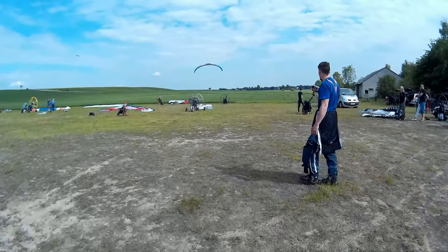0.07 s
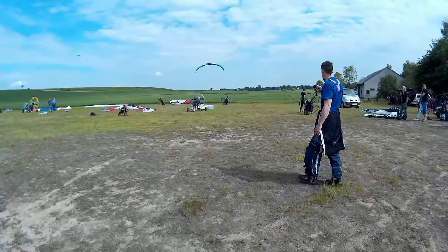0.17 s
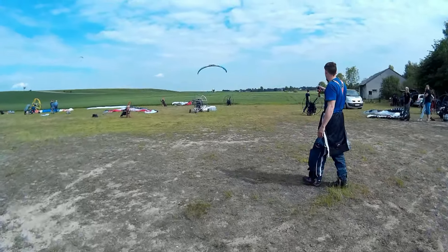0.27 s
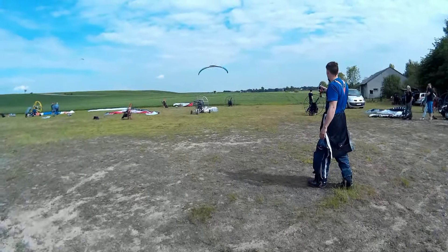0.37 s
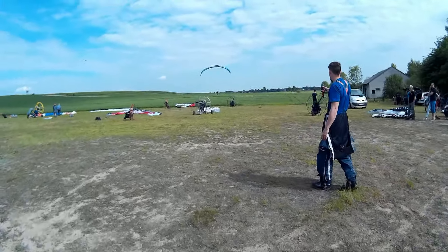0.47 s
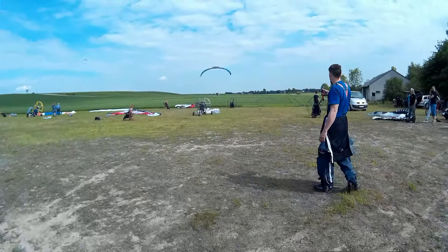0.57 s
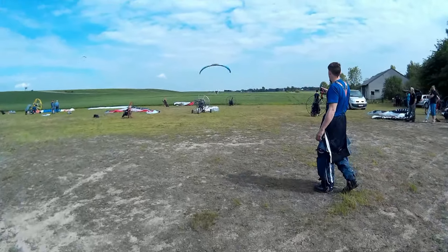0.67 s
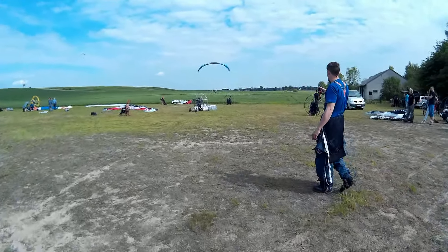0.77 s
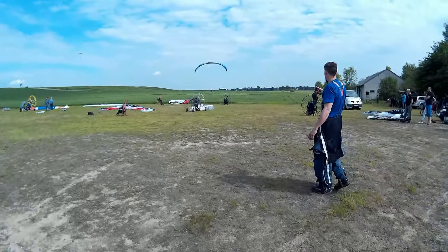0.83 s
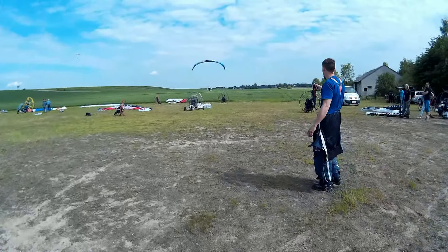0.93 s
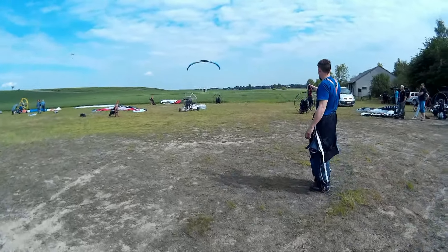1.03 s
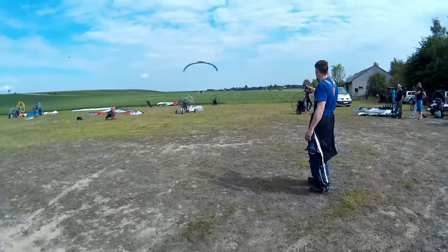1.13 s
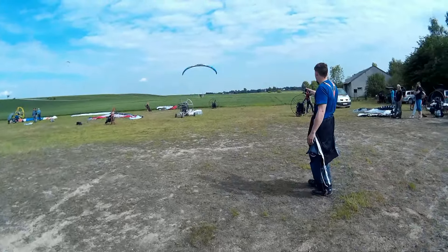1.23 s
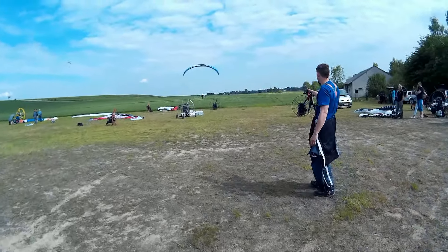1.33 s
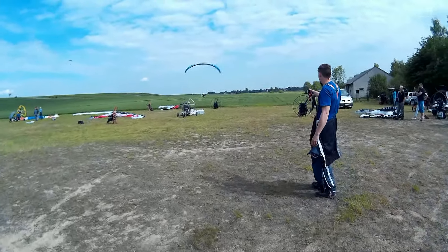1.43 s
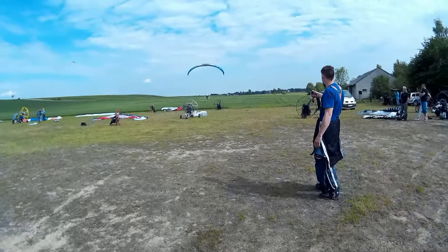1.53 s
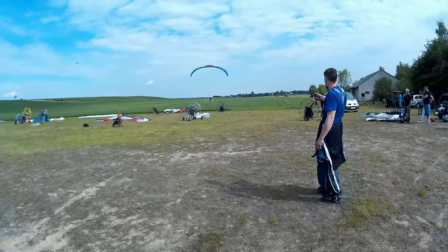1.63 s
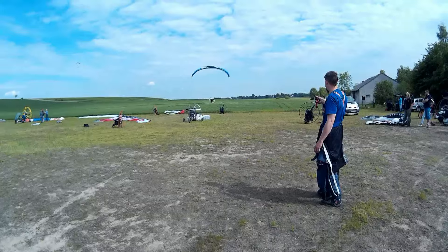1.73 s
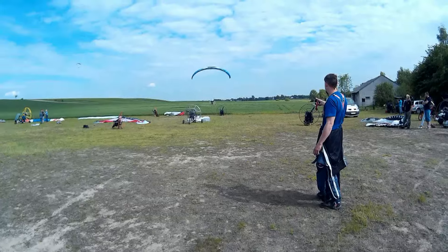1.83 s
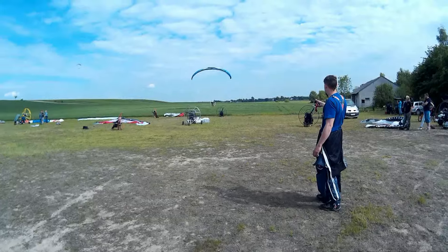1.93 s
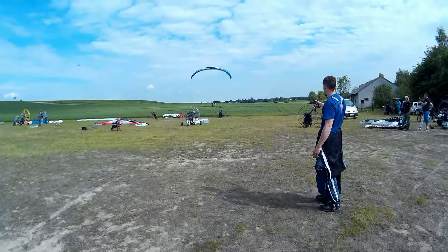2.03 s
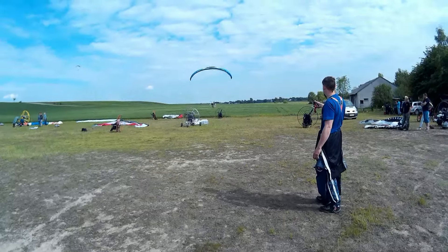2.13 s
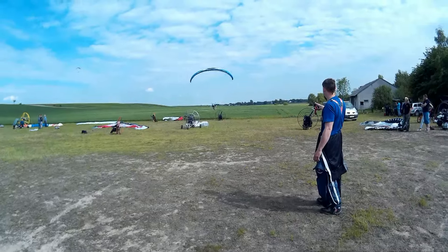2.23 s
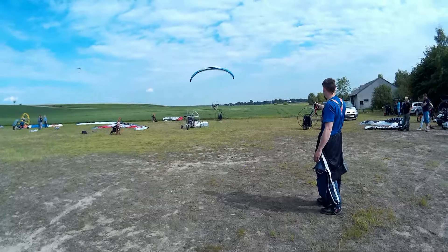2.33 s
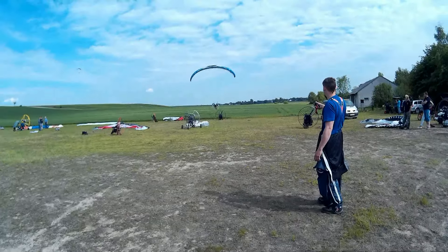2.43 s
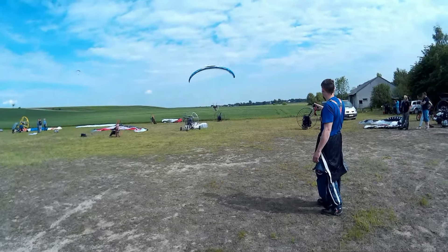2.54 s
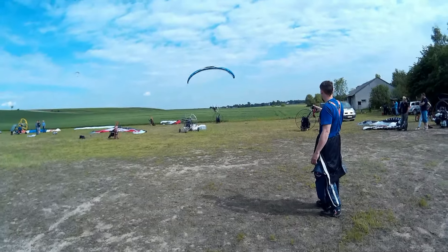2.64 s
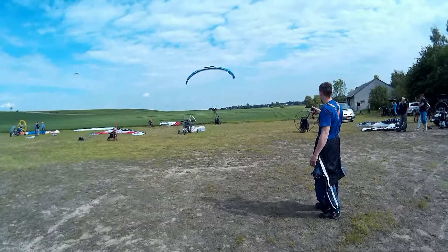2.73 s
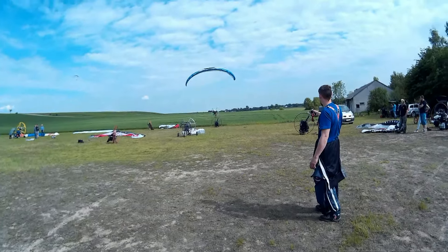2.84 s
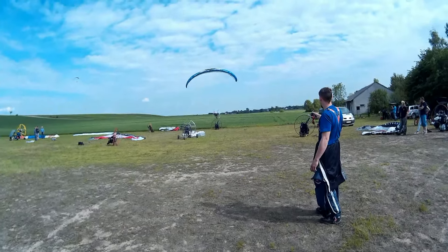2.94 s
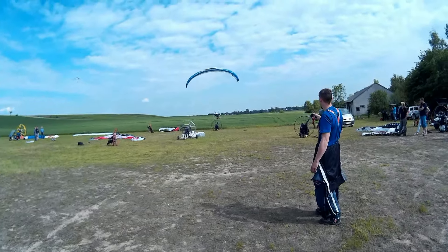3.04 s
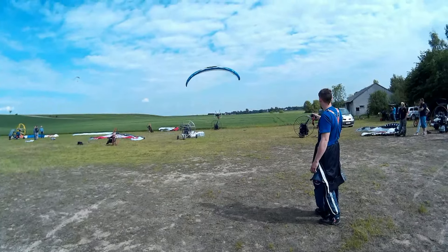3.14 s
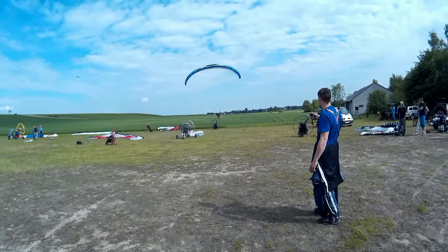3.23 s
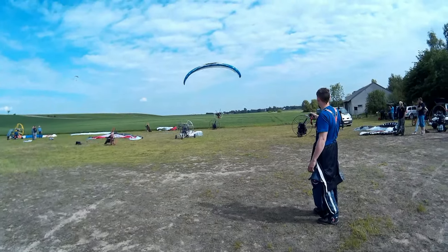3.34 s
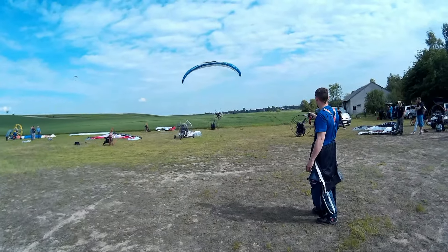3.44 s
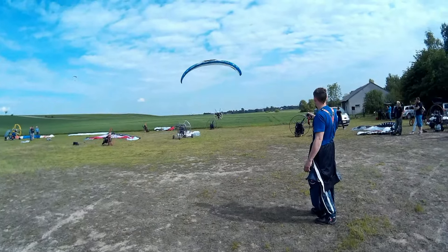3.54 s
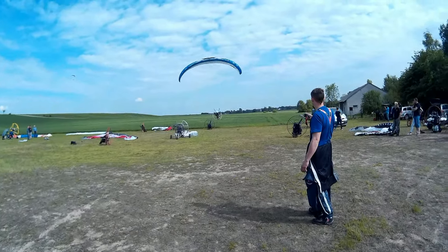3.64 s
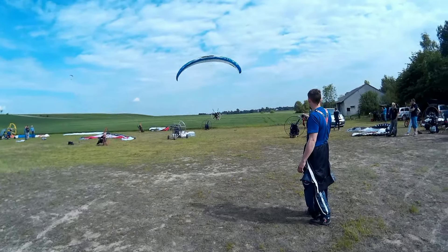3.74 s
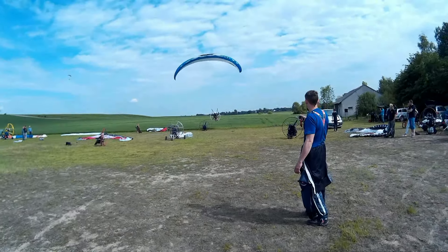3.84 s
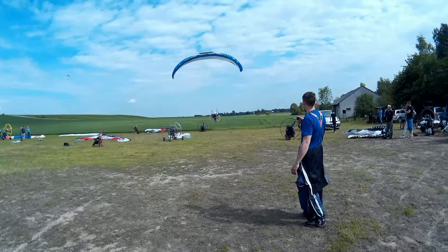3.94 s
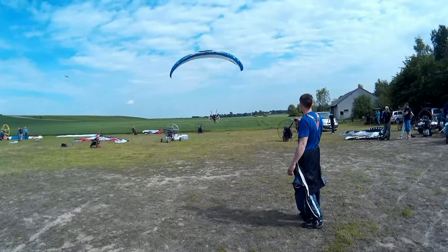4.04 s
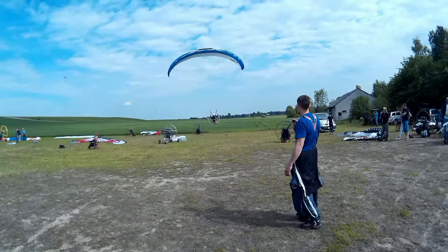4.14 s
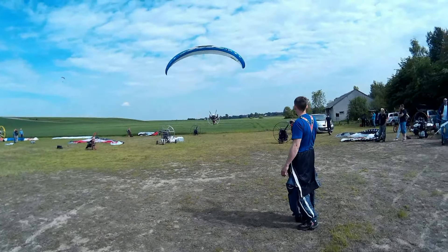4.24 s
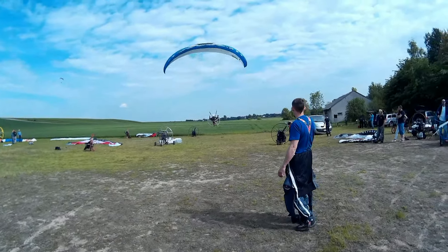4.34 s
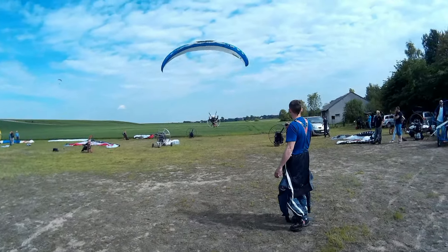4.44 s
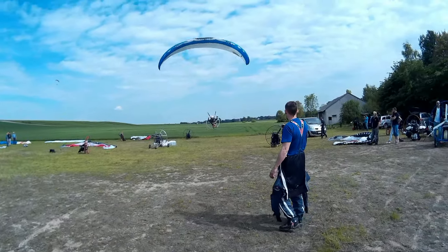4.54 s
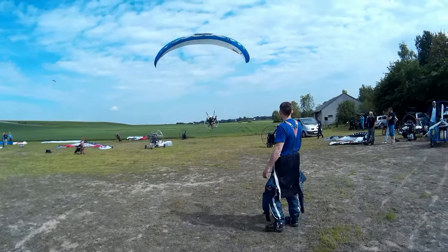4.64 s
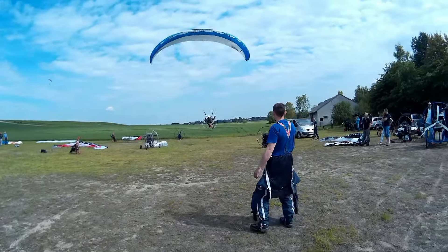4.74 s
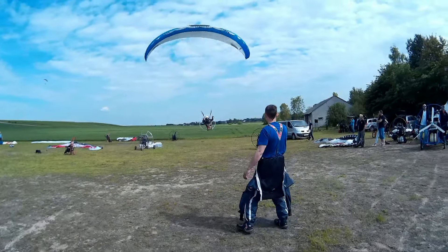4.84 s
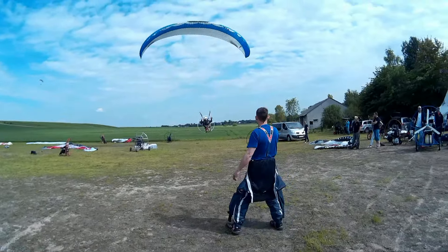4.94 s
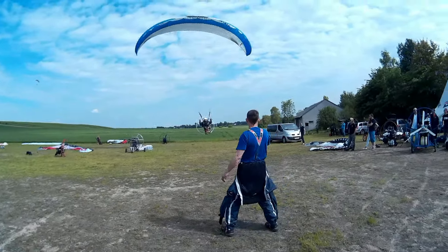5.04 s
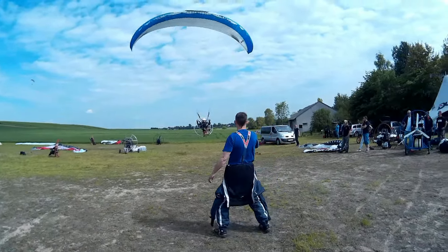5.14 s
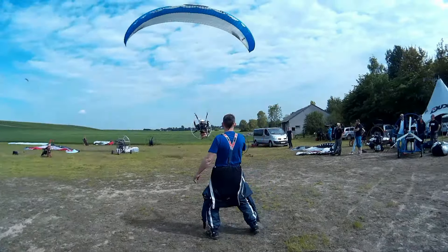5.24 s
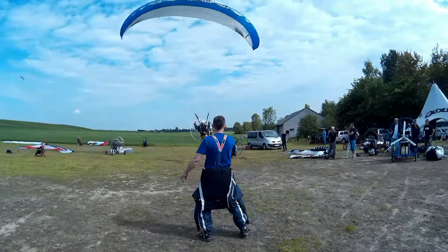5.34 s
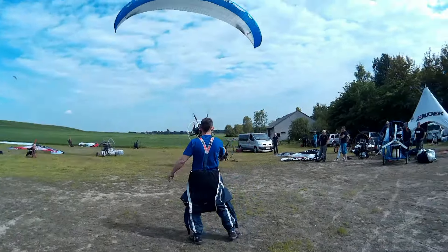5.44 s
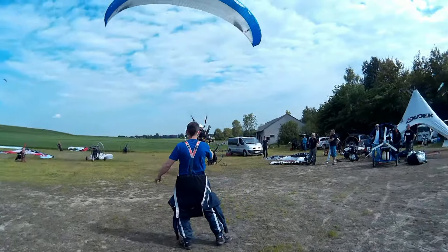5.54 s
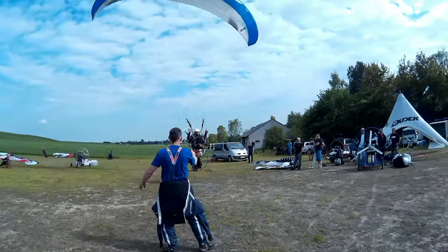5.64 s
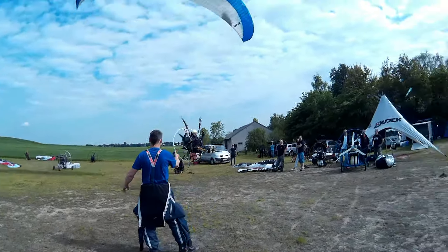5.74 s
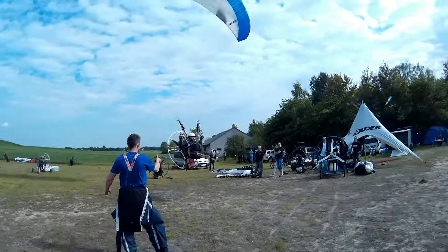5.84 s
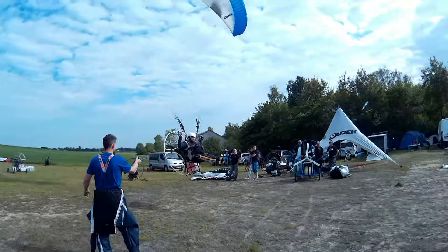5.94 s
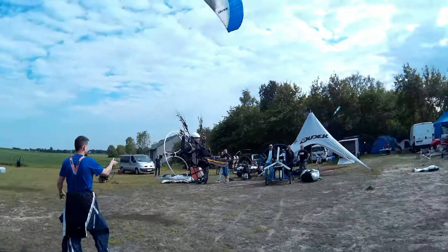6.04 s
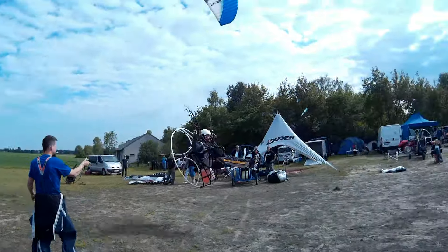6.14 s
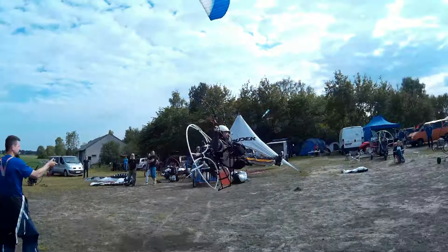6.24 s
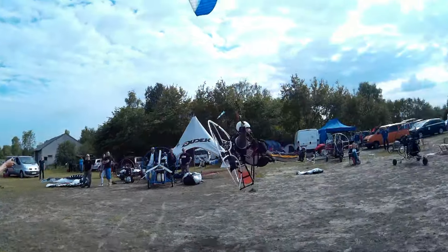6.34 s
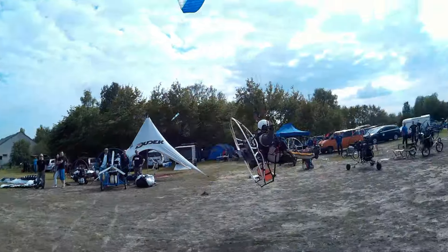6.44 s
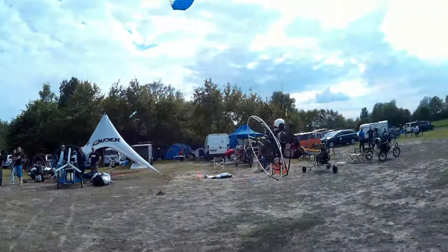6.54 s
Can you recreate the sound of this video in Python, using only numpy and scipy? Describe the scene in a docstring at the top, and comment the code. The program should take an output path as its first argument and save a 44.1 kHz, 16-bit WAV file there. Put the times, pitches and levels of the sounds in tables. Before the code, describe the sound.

A paramotor's two-stroke engine and propeller buzz from the start, fairly distant over an open field, with air rushing off the blades. The pitch rises slightly around 1 second, sags between 1.5 and 2.5 seconds, then climbs back, louder and brighter, by 3 seconds. Near 4 seconds the throttle drops sharply to its lowest pitch. From about 4.4 to 5.4 seconds it revs up again with a gritty rasp, then eases a little. The craft keeps nearing, with a slight sweeping colour from the ground reflection, and is loudest from 6 seconds to the end at about 6.6, with thumping blades, snarling exhaust and sizzling air. Underneath, light wind rumbles on the microphone, gusting near 2, 4 and 6 seconds, over a faint hiss. A few soft, dull thumps come in the first three seconds.

```python
"""A thumping propeller and a snarling two-stroke fly in low over a field: a paramotor, its pilot
blipping the throttle, closest just before the end. The two blades thump and slap, the geared engine
fires 1.4 times per blade pass into a resonant pipe, and air rushes off the blades and sizzles at the
tips. The ground adds a sliding echo; wind buffets the microphone over its own hiss."""
import sys
import numpy as np
from scipy import signal
from scipy.fft import rfft, irfft, next_fast_len
from scipy.io import wavfile
from scipy.ndimage import uniform_filter1d, map_coordinates

SR = 44100
rng = np.random.default_rng(int(sys.argv[2]) if len(sys.argv) > 2 else 0)


def wav_record(signal):
    """Record a signal, one row per channel, as 16-bit PCM in the file named by sys.argv[1]."""
    frames = np.transpose(np.atleast_2d(signal))
    bounded = np.clip(frames, -1, 1)
    # unit amplitude maps onto the largest positive 16-bit level
    quanta = np.round(bounded * 32767).astype(np.int16)
    wavfile.write(sys.argv[1], SR, quanta)


N = 291055
TIME = np.arange(N) / SR


def undb(db):
    return 10 ** (np.asarray(db) / 20)


def curves(table):
    """Automation lanes: each column after the time, one value a sample."""
    times, *columns = np.transpose(table)
    return [np.interp(TIME, times, column) for column in columns]


def colour_db(table, hz):
    """An EQ curve read on a log-frequency axis, silent beyond its ends."""
    points_hz, db = np.transpose(table)
    return np.interp(np.log(hz), np.log(points_hz), db, left=-120, right=-120)


def wander(rate):
    """Smooth random drift, about rate turns a second."""
    knots = rng.standard_normal(int(N / SR * 60) + 2)
    span = int(SR / rate)
    return 1.86 * uniform_filter1d(np.interp(np.arange(N) / span, np.arange(len(knots)), knots), span)


def flickering_noise(colour, flicker_db, rate, bright=0):
    """Noise in half-octave bands, each flickering alone; bright tilts the treble."""
    size = next_fast_len(N)
    hz = np.maximum(np.arange(size // 2 + 1) * SR / size, 1)
    spectrum = rfft(rng.standard_normal(size)) * undb(colour_db(colour, hz))
    spectrum /= np.sqrt(2 * np.sum(abs(spectrum) ** 2)) / size
    out = 0
    for band in range(7, 29):
        window = np.cos(np.pi / 2 * np.clip(2 * np.log2(hz) - band, -1, 1)) ** 2
        tilt_db = bright * np.clip(band / 2 - 9, 0, 1.75)
        out += irfft(spectrum * window, size)[:N] * undb(flicker_db * wander(rate) + tilt_db)
    return out


def overtones(phase, hz, orders, colour, bright, swell_db, blur, scatter, accent_db=lambda k: 0):
    """A pulse train's overtones: turbulent air swells and blurs each, echoes scatter their phases."""
    out, power = 0, 0
    for k in orders:
        tilt_db = bright * np.maximum(np.log2(k * hz / 500), 0)
        gain = undb(colour_db(colour, k * hz) + tilt_db)
        power += gain ** 2 / 2
        drift = blur * np.sqrt(k) * wander(30) + scatter * (rng.standard_normal() + wander(0.96))
        out += gain * undb(swell_db * wander(7) + accent_db(k)) * np.cos(k * phase + drift)
    return out / np.sqrt(power)


# The throttle moves. Each row: time in seconds, blade passes per second.
THROTTLE = [(0.0, 87.9), (0.09, 87.5), (0.58, 88.3), (0.9, 93.0), (1.04, 94.0), (1.17, 92.7), (1.5, 83.6),
            (1.74, 82.8), (2.0, 73.6), (2.16, 72.6), (2.46, 72.7), (2.9, 86.2), (3.17, 87.7), (3.74, 84.3),
            (3.81, 81.5), (4.05, 62.5), (4.29, 58.3), (4.36, 59.5), (4.53, 69.0), (4.65, 74.2),
            (4.84, 79.8), (5.09, 85.3), (5.33, 88.2), (5.48, 88.6), (5.75, 81.5), (6.32, 80.4),
            (6.49, 77.5), (6.58, 77.5)]
# The main faders. Each row: time in seconds; base levels in dB of second blade tone, third blade tone,
# drone, mids, treble, tip sizzle and air rush; the exhaust's share of the mids from 0 to 1.
FADERS = [(0.08, -51.5, -61, -51.5, -55, -65, -78, -52.5, 0.46),
          (0.13, -49.5, -66, -50.5, -49.5, -66, -77, -49.5, 0.52),
          (0.48, -49, -72, -53, -49.5, -70, -76, -50, 0.2),
          (0.8, -45, -79, -51.5, -43, -58.5, -70.5, -49, 0.4),
          (1.12, -46.5, -64, -44.5, -47.5, -64.5, -80, -49, 0.1),
          (1.36, -43.5, -66, -50.5, -43, -65, -78, -47, 0.4),
          (1.48, -47, -61, -55, -46.5, -65, -77, -49.5, 0.6),
          (1.55, -44, -59, -51, -42.5, -65, -75, -45.5, 0.4),
          (1.67, -43, -57, -53.5, -43.5, -56, -72, -47.5, 0.16),
          (1.87, -48.5, -57, -48, -44, -62, -78, -49.5, 0.8),
          (2.07, -53.5, -58, -52.5, -48.5, -74, -88, -47, 0.76),
          (2.46, -52, -63, -52.5, -48.5, -67.5, -83, -48, 0.62),
          (2.6, -49.5, -58.5, -44, -42.5, -61, -81, -43.5, 0.37),
          (2.75, -43, -48.5, -49, -35.5, -57, -66, -42, 0.5),
          (2.91, -40.5, -54, -40.5, -35, -44.5, -64, -42.5, 0.34),
          (3.07, -41, -56, -37, -36, -41, -64, -41, 0),
          (3.22, -41.5, -54, -39.5, -32.5, -40.5, -60.5, -45, 0.05),
          (3.4, -40.5, -50, -41, -34.5, -43, -65.5, -43.5, 0.32),
          (3.72, -43, -38.5, -40.5, -37, -48, -60, -44.5, 0.24),
          (3.98, -48.5, -46, -41, -44, -57.5, -66.5, -42, 0.1),
          (4.28, -49.5, -45, -42, -36, -50, -69, -42, 0.3),
          (4.48, -47.5, -41.5, -44, -32.5, -44.5, -62.5, -43.5, 0.18),
          (4.68, -45, -43, -43, -30.5, -50, -69, -37, 0.38),
          (4.83, -43, -49.5, -42.5, -30, -39.5, -62, -42, 0.3),
          (5.02, -38.5, -45, -46, -31.5, -43.5, -62, -43, 0.38),
          (5.19, -37.5, -44, -45, -38.5, -52.5, -65, -45, 0.31),
          (5.46, -33, -42.5, -43, -33.5, -49, -68.5, -45, 0.46),
          (5.8, -31.5, -45.5, -41, -33.5, -51, -64.5, -39.5, 0.58),
          (5.93, -31.5, -39.5, -41, -28, -43, -55.5, -38, 0.54),
          (6.05, -29.5, -56, -35.5, -29.5, -39.5, -54.5, -40, 0.2),
          (6.22, -30.5, -64, -33.5, -31, -39, -50, -36.5, 0.83),
          (6.25, -31.5, -42, -37, -27.5, -35, -49.5, -38, 0.61),
          (6.38, -32.5, -39.5, -43.5, -25, -37, -53, -37, 0.71),
          (6.56, -30.5, -40.5, -49, -24, -35.5, -50, -34, 0.76)]
# Shifts of timbre. Each row: time in seconds, then boosts in dB for blade overtones 6-8, 13-16, 10 and
# every third (8, 11, 14 ..), for the exhaust's bark and for its throb.
ACCENTS = [(0, 11.5, -5, 5, 10.5, 0, 7), (.5, 2, 7, 5, 1, 2, 1.5), (1, -2, 1.5, 2, 5, 1, 10),
           (1.4, 3.5, 7, 0, 1, 1, 3.5), (1.8, 2, 0, 0, 5, 1, -4), (2.2, 9, -10, -2, -3, 0, -3),
           (2.55, 11, 7, 3, 2, 7, -0.5), (2.8, -6, -9, 5, 5.5, 0, -3), (3.1, -7, -7, 8, -2, 0, 6),
           (3.4, -4, 6, 6.5, 1.5, 1, -12), (3.7, 0, 2, -2, 7.5, -5, 0), (4, -6.5, -0.5, 7, -3, 11, 6),
           (4.3, -5, -0.5, 3, 3, 3.5, 4), (4.6, -7.5, -3, 5, 0, 6.5, 2), (4.9, -6.5, -3, 0, -1.5, -1, 1.5),
           (5.2, 2.5, 0, 8.5, 3, 3, -2.5), (5.5, -1.5, -1, 0, 1.5, -2, -2.5), (5.9, 3.5, 3, -6, 0.5, 0, -5),
           (6.2, -3, -4.5, 9, 1.5, 8.5, -5.5), (6.6, 5.5, -3, 0, 2, 1.5, -8)]
# Grit, worst while the propeller chops its own wake and then stalls under load.
# Each row: time in seconds, base phase blur in radians.
ROUGHNESS = [(0, .1), (2.7, .1), (3.8, .1), (4.15, .26), (4.45, .5), (4.75, .44), (5.0, .22), (5.35, .13),
             (6.6, .14)]
AIRSPEED_M_S, CLOSEST_AT_S, CLOSEST_M = 16, 6.42, 3.5
FIRINGS_PER_BLADE, LOAD_DB_PER_HZ_S = 1.4, 0.1718


def paramotor():
    """Propeller, exhaust and rushing air, all locked to one shaft speed."""
    second_db, third_db, drone_db, mid_db, treble_db, sizzle_db, rush_db, share = curves(FADERS)
    *slap_accents, bark_db, throb_db = curves(ACCENTS)
    rough = curves(ROUGHNESS)[0]
    blade_hz = uniform_filter1d(curves(THROTTLE)[0], int(.06 * SR), mode="nearest")
    blade_phase = 2 * np.pi * np.cumsum(blade_hz) / SR
    fire_phase, fire_hz = FIRINGS_PER_BLADE * blade_phase, FIRINGS_PER_BLADE * blade_hz
    rev_rate = uniform_filter1d(np.gradient(blade_hz) * SR, SR // 5, origin=-SR // 20)
    load_db = LOAD_DB_PER_HZ_S * np.maximum(rev_rate, 0)  # revving up deepens thump and throb
    metres = np.hypot(AIRSPEED_M_S * (TIME - CLOSEST_AT_S), CLOSEST_M)
    bright = 9 + 0.22 * (treble_db - mid_db + 13)  # dB per octave above 500 Hz
    slap_gain, snarl_gain = undb(mid_db) * (1 - share), undb(mid_db + 2) * share

    thump = blade_thump(blade_phase, second_db, third_db, load_db, metres)
    drone = undb(drone_db) * blade_drone(blade_phase, blade_hz, bright)
    slap = blade_slap(blade_phase, blade_hz, bright, rough, slap_gain, treble_db, slap_accents)
    throb = exhaust_throb(fire_phase, fire_hz, bright, load_db + throb_db, metres)
    snarl = snarl_gain * exhaust_snarl(fire_phase, fire_hz, bright, rough, bark_db)
    rush, sizzle = blade_air(blade_phase, fire_phase, bright, rush_db, sizzle_db)
    # Long low waves pass the echo unchanged, and the grass swallows the echo of the sizzle.
    return thump + drone + throb + sizzle + ground_echo(slap + snarl + rush) + noise_swells(blade_phase)


def blade_thump(phase, second_db, third_db, load_db, metres):
    """The three lowest tones of the blades' pressure pulse; the fundamental is strongest side-on."""
    side_on = (CLOSEST_M / metres) ** 2
    first_db = second_db - 8 + 13.5 * side_on + load_db
    levels_db = (first_db, second_db, third_db)
    return np.sqrt(2) * sum(undb(db) * np.cos(k * phase) for k, db in enumerate(levels_db, 1))


# The EQ of the blade overtones. Each row: frequency in Hz, gain in dB.
BLADE_EQ = [(150, 43), (260, 3.5), (350, 12), (440, 11), (560, 11.5), (680, 2), (800, 7), (920, 2.5),
            (1050, 1.5), (1250, -11.5), (1500, -16), (1900, -22), (2600, -39)]


def blade_drone(phase, hz, bright):
    """The fourth and fifth blade tones hum together, trading weight."""
    fourth, fifth = (overtones(phase, hz, [k], BLADE_EQ, bright, swell_db=1.2, blur=.08, scatter=.3)
                     for k in (4, 5))
    balance = undb(curves(GROUND_BOUNCE)[2])
    return (balance * fourth + fifth) / np.hypot(balance, 1)


def blade_slap(phase, hz, bright, rough, mid_gain, treble_db, accents):
    """The sharp part of each blade pulse: a midrange buzz with a raspy edge."""
    low_db, high_db, tenth_db, every_third_db = accents

    def comb_db(k):
        return every_third_db if k % 3 == 2 else -every_third_db / 2

    def buzz_db(k):
        return comb_db(k) + (low_db if k < 9 else high_db if k > 12 else {10: tenth_db, 12: 2}.get(k, 0))

    buzz = overtones(phase, hz, range(6, 17), BLADE_EQ, bright,
                     swell_db=1.4, blur=.75 * rough, scatter=1.5, accent_db=buzz_db)
    edge = overtones(phase, hz, range(17, 29), BLADE_EQ, bright=0,
                     swell_db=2, blur=1.3 * rough, scatter=1.5, accent_db=comb_db)
    return mid_gain * buzz + undb(treble_db - 7) * edge


# The resonances of the exhaust pipe. Each row: frequency in Hz, gain in dB.
PIPE_EQ = [(80, -11), (100, -12.5), (118, 12.5), (170, -1), (240, 1), (340, -34), (450, -9), (560, 11.5),
           (670, 13), (790, -9), (900, 5), (1100, -3.5), (1230, -11), (1350, -11), (1700, -46), (2600, -38)]


def exhaust_throb(phase, hz, bright, boost_db, metres):
    """The three lowest firing tones, growing as the engine nears."""
    throb = overtones(phase, hz, range(1, 4), PIPE_EQ, bright, swell_db=2, blur=.1, scatter=.5)
    return undb(boost_db - 21) / metres * throb


# The exhaust's fifth and sixth overtones swell and dip. Each row: time in seconds, gain in dB.
EXHAUST_MID_FADER = [(0, 5), (.7, -2), (2, -3), (2.9, 0), (3.8, -9), (4.3, 2), (4.8, -1.5), (5.3, 4),
                     (5.9, -1), (6.6, -1)]


def exhaust_snarl(phase, hz, bright, rough, bark_db):
    """Upper firing overtones ring through the pipe; four of them carry the bark."""
    mid_boost_db = curves(EXHAUST_MID_FADER)[0]
    boosts_db = {5: mid_boost_db, 6: mid_boost_db,
                 7: bark_db, 12: bark_db, 4: 2 * bark_db, 16: 2 * bark_db}
    return overtones(phase, hz, range(4, 22), PIPE_EQ, bright,
                     swell_db=1.2, blur=.8 * rough, scatter=.8, accent_db=lambda k: boosts_db.get(k, 0))


# Air rush, dulled by the microphone housing. Each row: frequency in Hz, gain in dB.
RUSH_EQ = [(60, 2.5), (140, 11.5), (270, 6), (450, 14.5), (650, 12), (1000, 3), (1400, -7.5), (1750, -11),
           (2000, -21), (2400, -22.5), (3200, -45.5), (4500, -47.5)]
# Tip sizzle through the housing's treble resonances. Each row: frequency in Hz, gain in dB.
SIZZLE_EQ = [(1200, -33), (2000, 8), (2700, 8), (3200, -2.5), (3900, -4), (4500, -8), (5300, -9),
             (6300, -24.5), (7700, -15), (9200, -22), (10400, -28), (12000, -20.5), (13500, -32),
             (15800, -52)]


def blade_air(blade_phase, fire_phase, bright, rush_db, sizzle_db):
    """Air off the blades and their tips puffs with each pass and firing, and swells with eddies."""
    rush = undb(rush_db) * flickering_noise(RUSH_EQ, flicker_db=.7, rate=6, bright=bright)
    sizzle = undb(sizzle_db) * flickering_noise(SIZZLE_EQ, flicker_db=1, rate=8)
    puff = 1 + 0.14 * np.cos(blade_phase) + 0.22 * np.cos(fire_phase)
    puff *= undb(.4 * wander(6))
    return puff * rush, puff * sizzle


# The bounce off the field. Each row: time in seconds, first comb peak in Hz, echo strength from 0 to 1,
# the drone's fourth tone over its fifth in dB.
GROUND_BOUNCE = [(0, 2000, 0.03, -17), (.5, 1850, 0.3, 0), (1, 1880, 0.38, 2), (1.5, 1880, 0.31, -9),
                 (2, 1700, 0.3, -5.5), (2.5, 1690, 0.19, -15), (2.9, 1760, 0.32, -15),
                 (3.3, 1750, 0.48, -4), (3.7, 1770, 0.34, -0.5), (4, 1380, 0.5, 1.5), (4.4, 1360, 0.43, 0),
                 (4.8, 1360, 0.28, -10), (5.1, 1200, 0.24, 3), (5.5, 1240, 0.12, 1.5),
                 (5.85, 1220, 0.15, 9), (6.1, 1220, 0, 3), (6.35, 1360, 0, 5.5), (6.6, 1450, 0.07, 4)]


def ground_echo(direct):
    """The field mirrors the sound a little late: peaks and dips slide as the path changes."""
    peak_hz, strength, _ = curves(GROUND_BOUNCE)
    lag = uniform_filter1d(SR / peak_hz, SR // 10, mode="nearest")
    echo = map_coordinates(direct, [np.arange(N) - lag], mode="nearest")
    return (direct + strength * echo) / np.hypot(1, strength)


# The wind's rumble. Each row: frequency in Hz, gain in dB.
WIND_EQ = [(15, -24), (30, -17), (60, -19), (110, -24), (200, -28), (400, -42)]
# Stronger gusts. Each row: peak time in seconds, level in dB, half-length in seconds.
WIND_GUSTS = [(2.17, -56, 0.086), (3.237, -64, 0.38), (3.7, -65, 0.12), (4.012, -54, 0.09),
              (4.21, -62, 0.13), (6.024, -56, 0.16)]


def wind():
    """Low, restless buffeting on the microphone, with gusts on top."""
    gusts = sum(undb(db) * np.exp(-((TIME - peak_s) / half_s) ** 2) for peak_s, db, half_s in WIND_GUSTS)
    breeze = undb(-60.5 + 4.5 * wander(14))
    return (breeze + gusts) * flickering_noise(WIND_EQ, flicker_db=2.2, rate=6)


# Dull low thumps. Each row: start in seconds, level in dB, pitch in Hz.
LOW_THUMPS = [(.105, -43, 45), (0.32, -34.5, 112), (0.575, -39.5, 61), (1.624, -45, 84), (1.88, -52, 70),
              (3.07, -41, 90)]


def low_thumps():
    """Three soft cycles of a low tone each, like footsteps or knocks on the camera."""
    out = np.zeros(N)
    for start_s, db, hz in LOW_THUMPS:
        cycles = np.arange(int(3 * SR / hz)) * hz / SR
        envelope = undb(db) * np.sin(np.pi * cycles / 3) ** 2
        start = int(start_s * SR)
        out[start:start + len(cycles)] += envelope * np.sin(2 * np.pi * cycles)
    return out


# Brief swells of whistle, rasp and high hiss. Each row: peak time in seconds, half-length in seconds,
# centre in Hz, width in Hz, level in dB.
NOISE_SWELLS = [(2.98, 0.42, 4000, 260, -75), (3.163, 0.11, 940, 160, -46), (3.704, 0.15, 940, 140, -46),
                (4.417, 0.061, 1400, 200, -43.5), (4.52, 0.29, 3470, 800, -69.5),
                (4.656, 0.21, 1420, 348, -44), (6.448, 0.26, 3540, 800, -58.5),
                (6.52, 0.29, 1750, 400, -46), (1.2, .25, 1100, 880, -57), (4.6, 0.17, 1160, 400, -47.5),
                (5.9, .1, 7740, 1600, -80), (5.95, .2, 3900, 500, -77), (6.242, .22, 12000, 1400, -78.5),
                (6.56, .08, 12200, 1200, -79)]


def noise_swells(blade_phase):
    """Bands of noise that each swell once, pulsing with the blades."""
    out = 0
    for peak_s, half_s, hz, width_hz, db in NOISE_SWELLS:
        bandpass = signal.butter(2, [hz - width_hz / 2, hz + width_hz / 2], "bandpass", fs=SR, output="sos")
        band = signal.sosfilt(bandpass, rng.standard_normal(N))
        out += undb(db) * np.exp(-((TIME - peak_s) / half_s) ** 4) * band / band.std()
    return out * (1 + 0.35 * np.cos(blade_phase))


def scene():
    """The paramotor, the wind and a few low thumps, in mono."""
    return (paramotor() + wind() + low_thumps())[None]


# The colour of the microphone's hiss. Each row: frequency in Hz, gain in dB.
HISS_EQ = [(300, 7.5), (3000, 1.5), (5000, -1.5), (8000, -2.5), (11500, -3), (14000, -6.5), (15700, -19)]
# The hiss rises and sinks a little. Each row: time in seconds, gain in dB.
HISS_FADER = [(0, 0), (1, -1), (2, -.5), (3, 0), (3.7, -1), (4.3, 1), (4.9, 1.5), (5.3, -2), (5.8, -1),
              (6.6, 0)]


def record(dry):
    """The microphone adds its hiss; both ends fade over 3 ms and the top is cut steeply."""
    hiss_db = -71 + curves(HISS_FADER)[0] + .5 * wander(7)
    hiss = undb(hiss_db) * flickering_noise(HISS_EQ, flicker_db=.5, rate=9)
    fade = np.clip(np.minimum(TIME, TIME[::-1]) / .003 - .1, 0, 1)
    high_cut = signal.ellip(8, .2, 70, 15600, fs=SR, output="sos")
    return signal.sosfilt(high_cut, (dry + hiss) * fade)


dry = scene()
out = record(dry)
wav_record(out)
```